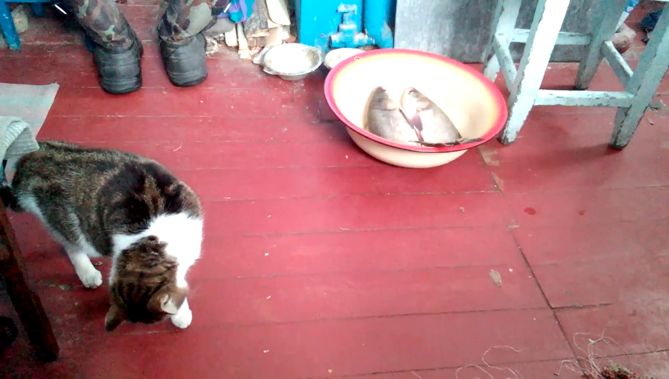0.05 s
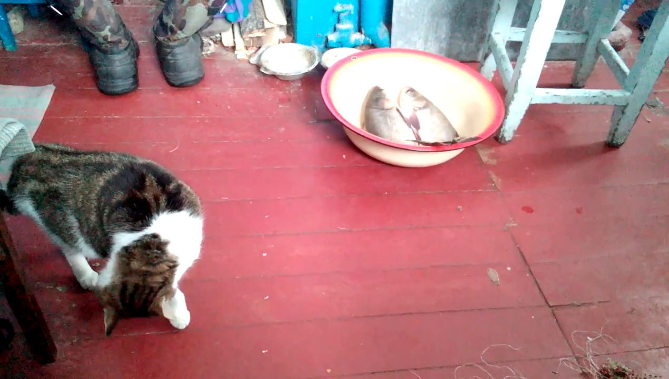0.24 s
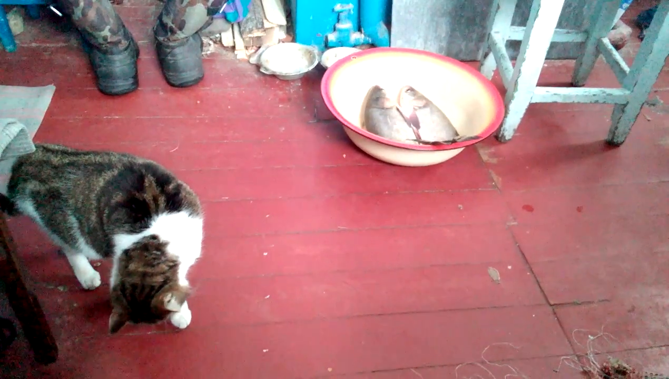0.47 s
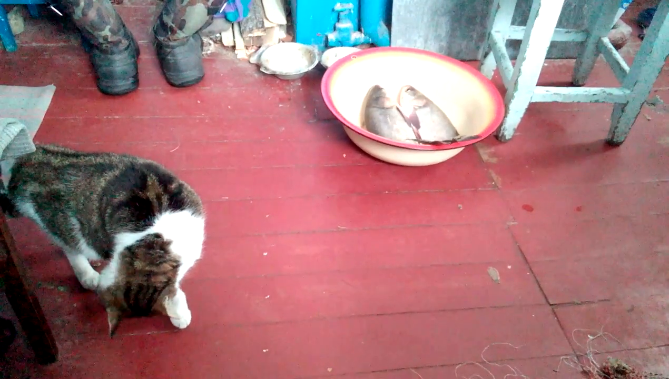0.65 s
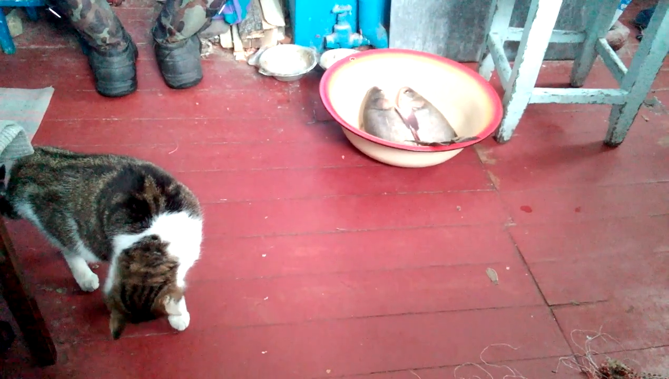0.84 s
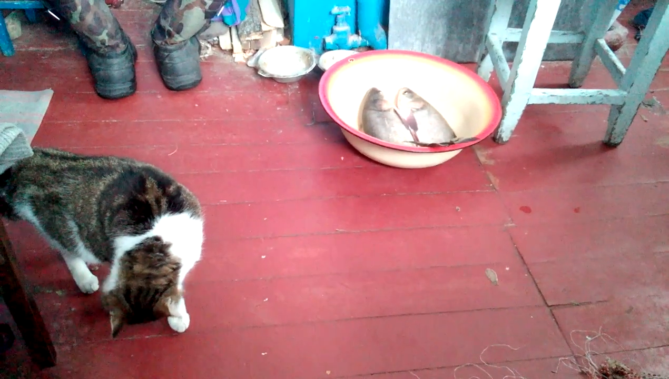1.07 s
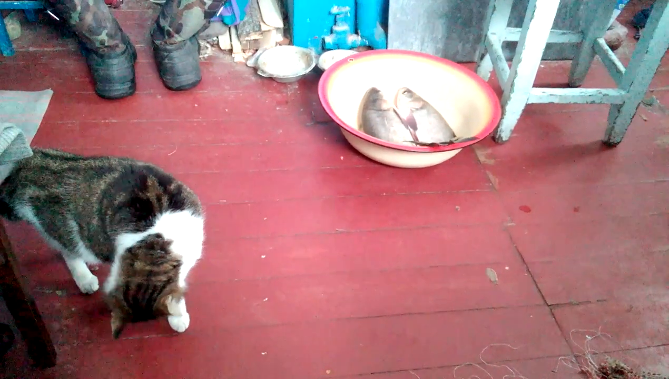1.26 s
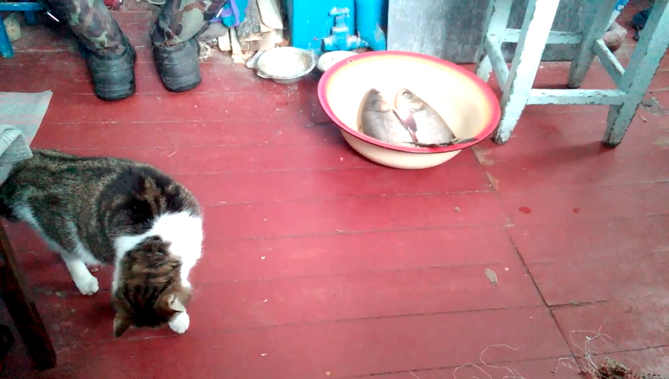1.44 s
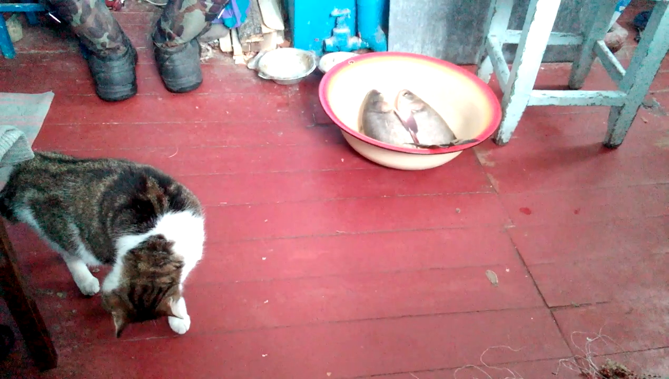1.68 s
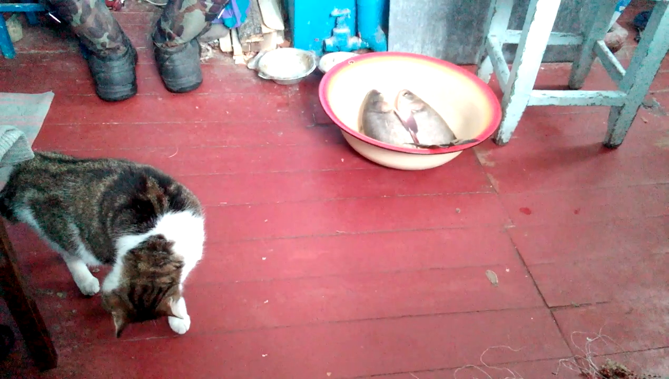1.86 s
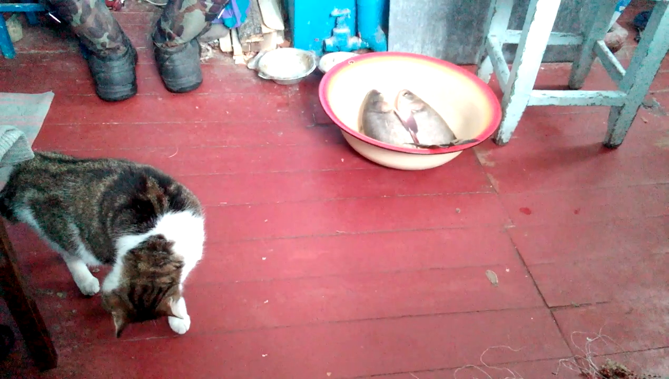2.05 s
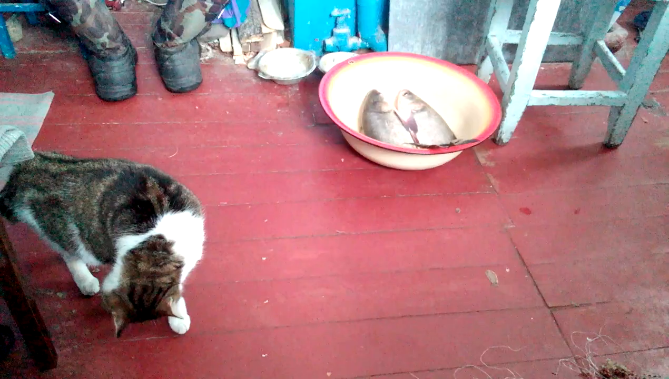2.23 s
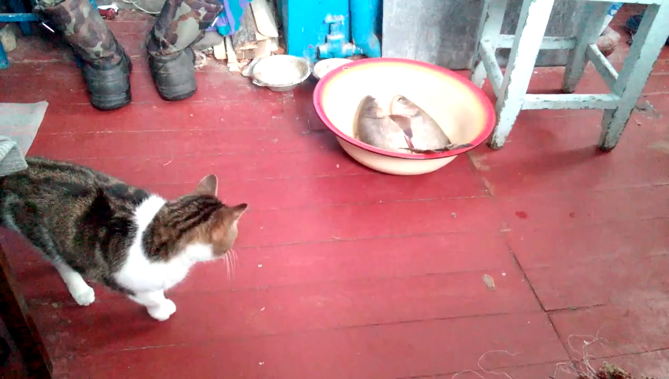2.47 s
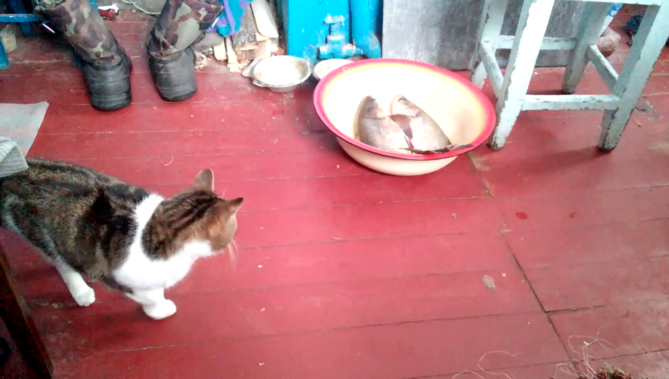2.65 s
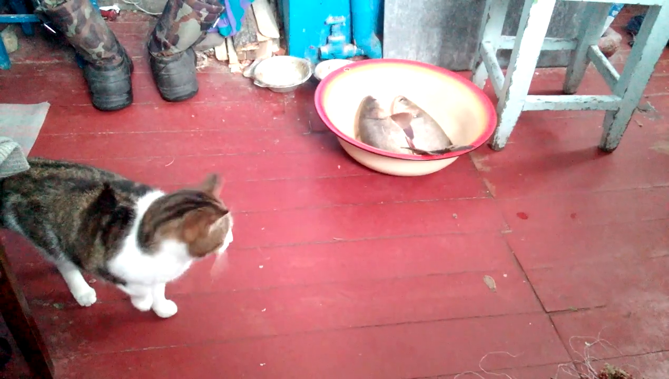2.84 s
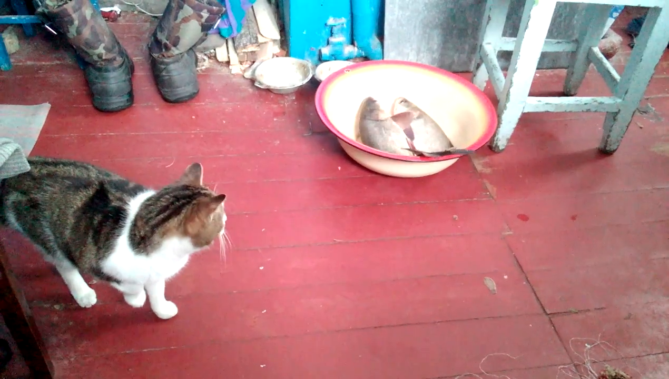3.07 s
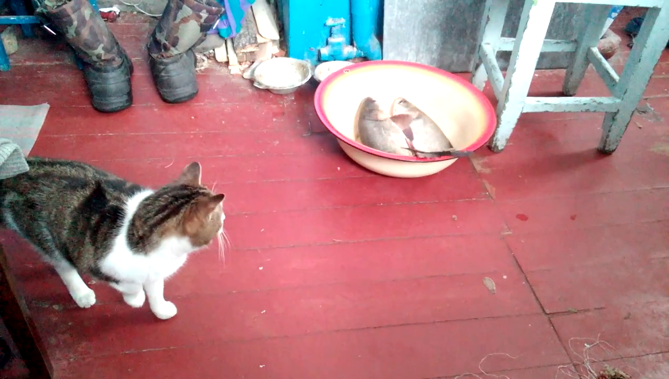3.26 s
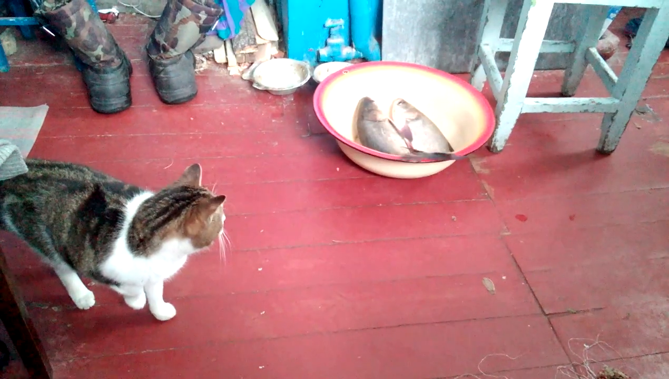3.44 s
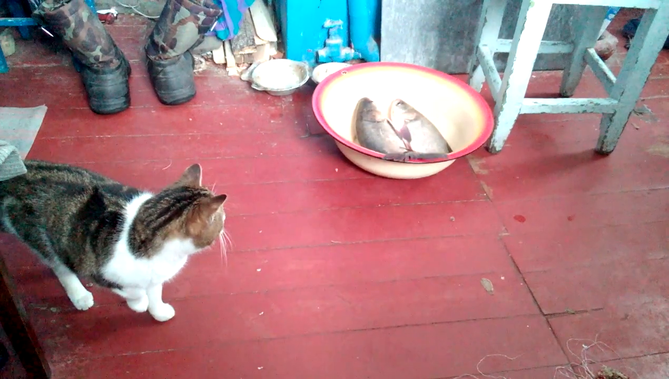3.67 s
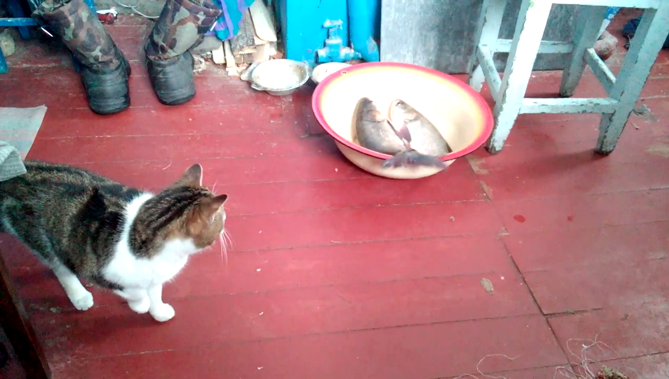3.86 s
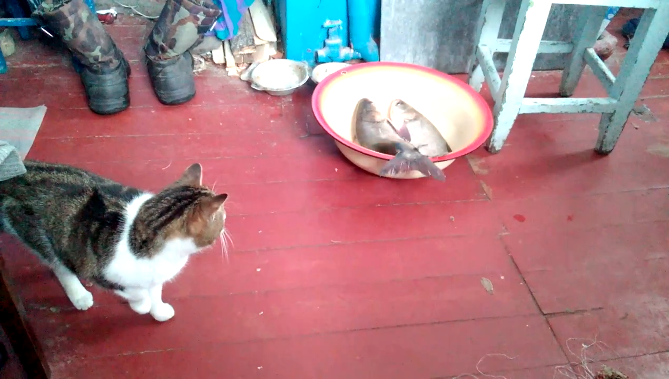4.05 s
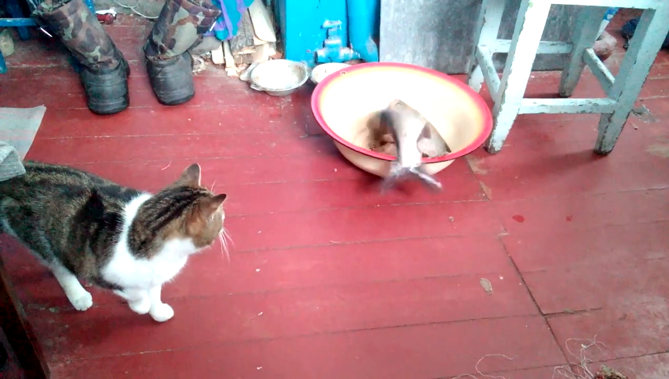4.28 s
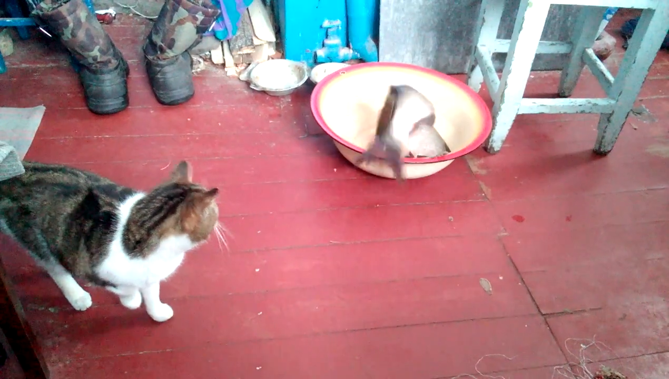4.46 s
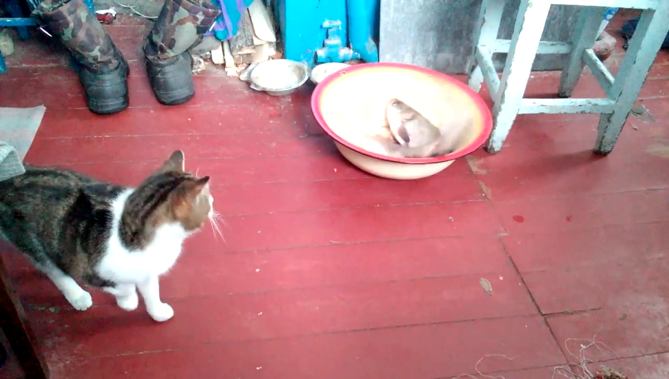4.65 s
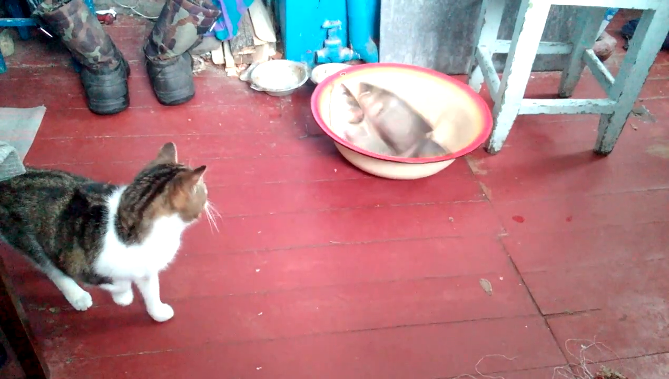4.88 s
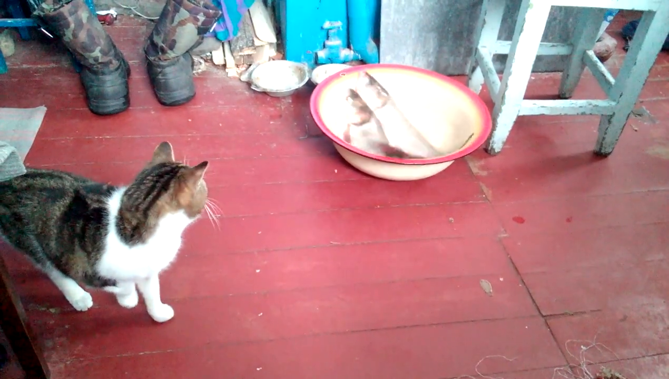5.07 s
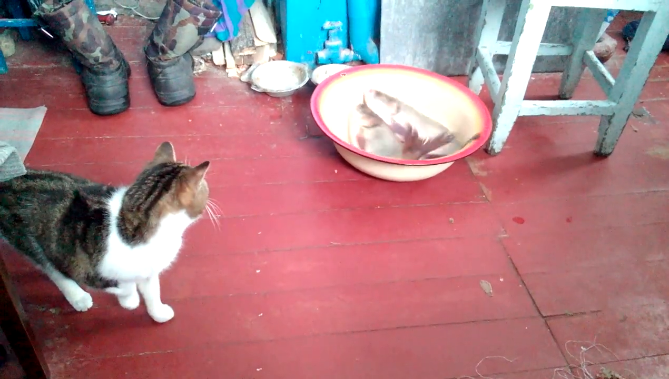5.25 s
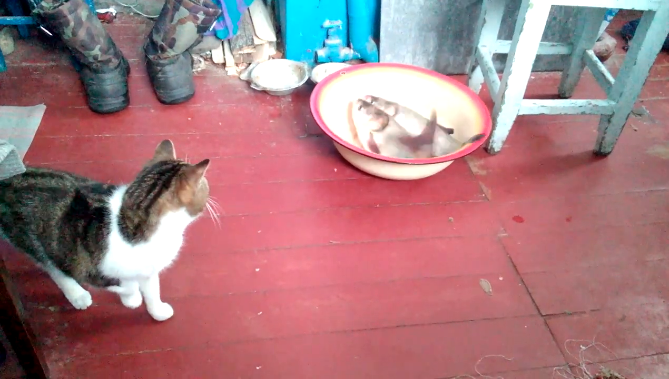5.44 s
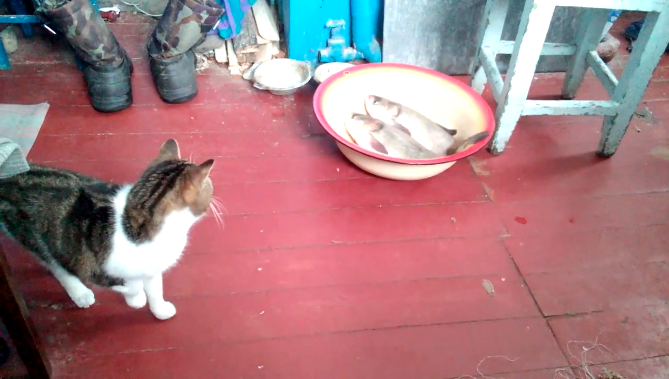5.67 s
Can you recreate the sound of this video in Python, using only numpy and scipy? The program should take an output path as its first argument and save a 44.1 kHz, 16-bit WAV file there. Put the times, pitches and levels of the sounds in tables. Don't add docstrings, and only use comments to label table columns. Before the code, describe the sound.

A fixed small-camera microphone hisses steadily in a small wooden-floored room with a short reverb. Furniture knocks quickly at half a second and more softly at one second. Two clear dish clinks ring out around three seconds. Then fish stir and thrash in a damped enamel basin, slapping wetly, thumping the boards and rocking the rim in short bursts before nearly stopping.

```python
import sys
import numpy as np
from scipy import signal
from scipy.fft import rfft, irfft, next_fast_len
from scipy.io import wavfile
from scipy.ndimage import uniform_filter1d

SR = 44100
rng = np.random.default_rng(int(sys.argv[2]) if len(sys.argv) > 2 else 0)


def voltage_ratio(level):
    return 10 ** (np.asarray(level, float) / 20)


def unload_wav(signal):
    wavfile.write(
        sys.argv[1],
        SR,
        np.round(np.clip(np.atleast_2d(signal).T, -1, 1) * 32767).astype(np.int16),
    )


N = 251807
SPAN = SR * 2 // 5
T = np.arange(SPAN) / SR
HZ = np.fft.rfftfreq(2 * SPAN, 1 / SR)

# frequency [Hz], density [dB per Hz].
HISS_SPECTRUM = [(15, -64), (25, -16.5), (91, -0.5), (216, -8), (261, -8.5), (299, -8), (371, -11),
                 (981, -13.5), (1180, -13), (5090, -15), (5520, -13.5), (6850, -15), (15800, -15.5)]
# frequency [Hz], time to fall 60 dB [s].
ROOM_DECAY = [(60, 0.3), (300, 0.31), (1500, 0.27), (5000, 0.24), (9000, 0.22), (14000, 0.14)]
# start [s], end [s], period [s], level [dB].
CHIRP_BOUTS = [
    (1.8, 2.3, .116, -83),
    (2.504, 3.1, .116, -84),
    (3.422, 4.15, .113, -78),
]
# start [s], peak [dB], contact [s], edge level [dB], added edge mode
# [Hz].
WOOD_KNOCKS = [
    (0.547, -43, 0.0049, -2, 3540),
    (0.6024, -34.5, 0.0026, -6.5, 5100),
    (0.612, -36, 0.004, -7, 4800),
    (1.045, -53, 0.011, 0, 5270),
    (1.061, -47, 0.0078, -5, 2900),
    (1.083, -52, 0.0061, -19, 4800),
]
# frequency [Hz], width [Hz], level [dB].
WOOD_MODES = [(276, 50, -9), (542, 80, -13), (812, 82, -5.5), (1080, 190, -12), (1320, 93, 0.5),
              (1560, 450, -15.5), (2070, 340, -17)]
# frequency [Hz], width [Hz], level [dB].
WOOD_EDGE_MODES = [(2650, 1400, -16), (4800, 360, -1), (5660, 770, -9), (7420, 270, -4), (9000, 620, -13)]
# start [s], peak [dB], centre [Hz].
TICKS = [
    (1.2422, -57.5, 6300),
    (1.4544, -70, 7150),
    (1.5694, -70, 7960),
    (1.5994, -70, 5500),
    (1.6761, -66, 7260),
    (3.5294, -67, 6900),
]
# start [s], peak [dB], centre [Hz].
TAPS = [
    (0.509, -64, 362),
    (0.9, -63, 296),
    (2.536, -64, 680),
    (2.665, -65.5, 690),
    (3.376, -68.5, 2850),
    (4.3, -62.5, 395),
    (4.515, -59.5, 299),
    (4.639, -49.5, 640),
    (5.629, -56, 670),
]
# start [s], peak [dB].
FIRST_EDGE_BLOWS = [
    (2.8815, -22.5),
    (2.889, -25),
]
# start [s], peak [dB].
SECOND_EDGE_BLOWS = [
    (3.151, -20.5),
]
# start [s], peak [dB].
LIGHT_TOUCHES = [
    (0.898, -53.5),
    (2.411, -53),
]
# frequency [Hz], width [Hz], level [dB].
FIRST_EDGE_MODES = [(264, 42, -10), (937, 69, -7), (1380, 50, -11), (2020, 34, -12), (2380, 120, -14),
                    (3230, 30, -15), (3490, 29, -4), (5310, 36, 0), (5580, 17, -17), (5930, 38, -15),
                    (6150, 29, -19), (6430, 27, -21), (6710, 55, -22), (6990, 36, -20), (7570, 110, -10),
                    (7830, 58, -26), (8130, 39, -11), (8510, 26, -22), (8800, 200, -16), (9650, 36, -13),
                    (10200, 49, -32), (11300, 48, -26), (11500, 40, -20), (11900, 48, -16),
                    (13000, 53, -20), (13100, 130, -27), (13800, 45, -24), (15300, 35, -34)]
# frequency [Hz], width [Hz], level [dB].
SECOND_EDGE_MODES = [(242, 70, -11), (1370, 71, -13), (2560, 42, -11), (3140, 97, -15), (3500, 140, -9),
                     (4140, 18, -11), (4350, 140, -9), (4700, 18, -15), (4940, 25, -17), (5490, 46, 0),
                     (5880, 49, -15), (6190, 42, -8), (6920, 28, -6), (7420, 87, 0), (7690, 15, -14),
                     (8090, 49, -10), (8540, 27, -22), (8710, 19, -20), (8840, 36, -15), (8970, 16, -15),
                     (9590, 120, -19), (10700, 38, -24), (11100, 43, -25), (11600, 42, -20),
                     (11900, 33, -22), (12400, 34, -25), (13000, 58, -21), (14600, 100, -32),
                     (5360, 56, 4.5), (7445, 42, 4), (7000, 27, -11)]
# frequency [Hz], width [Hz], level [dB].
FIRST_EDGE_FURTHER_MODES = [(3492, 9.3, -6.5), (5305, 28, -6.5), (5070, 73, -11)]
# frequency [Hz], level [dB].
CLATTER_SPECTRUM = [(150, -28), (400, -50), (1000, -7.5), (1700, -15), (3000, -12), (6000, -8),
                    (9000, -18.5), (12000, -16), (15500, -25)]
# start [s], peak [dB], strongest board mode [Hz].
THUMPS = [(0.901, -55, 295), (0.929, -48, 245), (1.071, -59, 290), (2.929, -63, 240), (3.155, -50, 284),
          (4.241, -59, 90), (4.296, -57.5, 139), (4.344, -47, 95.5), (4.699, -34, 144), (4.724, -27.5, 175),
          (4.744, -27, 244), (4.935, -36.5, 83), (5.187, -24.5, 209), (5.448, -56, 148),
          (5.669, -44.5, 103)]
# start [s], peak [dB].
FLAT_LANDINGS = [
    (1.019, -64),
    (3.237, -63),
    (4.451, -54),
    (4.513, -31.5),
    (4.552, -39.5),
    (4.669, -40),
    (5.632, -43.5),
]
# start [s], peak [dB], board mode [Hz],
# loss a rock [dB].
FALLS = [
    (4.63, -31.5, 87, 18),
    (4.763, -23.5, 114.3, 22),
    (4.961, -29.5, 169, 4.5),
    (5.209, -23, 113, 10),
]
# frequency [Hz], width [Hz], level [dB].
BOARD_MODES = [(57, 54, -8.5), (113, 11.3, -0.5), (175, 28, -2.5), (253, 71, -2), (330, 25, -8)]
# start [s], peak [dB], added rim mode [Hz], belly level [dB].
BOWL_KNOCKS = [(4.237, -60, 1410, -11), (4.309, -68, 1360, -13), (4.356, -54.5, 1030, -5),
               (4.628, -42.5, 910, -4), (4.72, -26, 960, -15), (4.748, -30.5, 1360, -5.5),
               (4.799, -41, 1040, -11), (4.944, -36.5, 1320, -1.5), (4.981, -34, 1035, -3.5),
               (5.039, -44, 1090, -5), (5.184, -28.5, 925, -2), (5.198, -27, 990, 21),
               (5.385, -61, 1335, 8), (5.631, -55.5, 990, -9)]
# frequency [Hz], width [Hz], level [dB].
BOWL_MODES = [(385, 80, 9.5), (670, 103, 9.5), (826, 210, -0.5), (1070, 48, 5), (1303, 33, 3),
              (1560, 160, -10), (2360, 1100, -15.5)]
# start [s], peak [dB], brightest frequency [Hz],
# treble tilt [dB per octave], slide under the slap [dB].
SLAPS = [(4.2305, -53, 5300, -5, 5), (4.2821, -49, 3850, 3, 6.5), (4.5233, -45.5, 4330, -4, 29),
         (4.605, -38.5, 4970, -3, 20), (4.615, -33, 3930, -5.5, 8.5), (4.7181, -29, 3080, 2.5, 30),
         (4.7289, -25.5, 2860, 4, 17), (4.847, -46.5, 4150, 5, 3.5), (4.948, -37, 3200, -4, 3),
         (4.9567, -36, 4800, 2.5, 7), (5.0269, -44, 5130, -9.5, 3), (5.107, -38, 4300, 0, 7.5),
         (5.1972, -35.5, 3500, -10.5, 13), (5.235, -52.5, 6800, 5, 0.5), (5.3767, -49.5, 2900, -12, 26),
         (5.663, -51, 7300, 11.5, 11)]
# frequency [Hz], density [dB per Hz].
WET_SPECTRUM = [(1060, -15.5), (1800, -17), (2400, -16.5), (2900, -3.5), (3320, -10), (4370, -3),
                (4740, -7.5), (8830, -10.5), (10800, -26), (16000, -26.5)]


def along(points, hz):
    f, v = np.transpose(points)
    return np.interp(np.log(hz + 1), np.log(f + 1), v)


def body(modes):
    total = 0
    for k, (centre, width, db) in enumerate(modes):
        damping = 1j * HZ * width
        total = total + (-1) ** k * voltage_ratio(db) * damping / (centre * centre - HZ * HZ + damping)
    return total


def contact(length):
    u = T / max(length, 0.0001)
    return rng.standard_normal(SPAN) * u * np.exp(-2 * u)


def room(x, wet_db):
    hz, t, z = signal.stft(rng.standard_normal(SPAN), SR, nperseg=256)
    t60 = np.maximum(along(ROOM_DECAY, hz), 0.03)[:, None]
    tail = signal.istft(z * voltage_ratio(-60 * t / t60), SR, nperseg=256)[1][:SPAN]
    tail = tail * (1 - np.exp(-T / 0.002))
    return x + voltage_ratio(wet_db) * signal.fftconvolve(x, tail / np.linalg.norm(tail))[:SPAN]


def add(out, s, db, force, response, wet_db):
    struck = irfft(rfft(force, 2 * SPAN) * response)[:SPAN]
    x = room(struck, wet_db)
    peak = np.sqrt(np.max(uniform_filter1d(x ** 2, size=256)))
    out[round(s * SR):][:SPAN] += voltage_ratio(db) * x / peak


def hiss():
    m = next_fast_len(N)
    colour = voltage_ratio(along(HISS_SPECTRUM, np.fft.rfftfreq(m, 1 / SR)))
    x = irfft(rfft(rng.standard_normal(m)) * colour, m)[:N]
    return voltage_ratio(-63.5) * x / np.std(x)


def insect(out):
    chirp_s, wing_hz, scatter_db = 0.049, 5540, -2
    wing = body([(wing_hz, 250, 0)]) ** 2
    for start, end, period, db in CHIRP_BOUTS:
        for s in np.arange(start, end, period):
            swell = np.sin(np.pi * np.clip(T / chirp_s, 0, 1))
            stroke = rng.standard_normal(SPAN) * swell
            add(out, s, db + scatter_db * rng.standard_normal() + 5, stroke, wing, wet_db=-8.5)


def furniture(out):
    for s, db, length, edge_db, hz in WOOD_KNOCKS:
        add(out, s, db - 5.5, contact(length), body(WOOD_MODES), wet_db=-0.5)
        edge = body(WOOD_EDGE_MODES) + 0.7 * body([(hz, 250, 0)])
        add(out, s, db + edge_db - 8, contact(3 * length), edge, wet_db=-1)


def ticks_and_taps(out):
    for rows, width_hz, contact_s in ((TICKS, 2900, 0.012), (TAPS, 500, 0.012)):
        for s, db, hz in rows:
            add(out, s, db, contact(contact_s), body([(hz, width_hz, 0)]) ** 2, wet_db=-3.0)


def dish(out):
    blow = np.exp(-T * SR)
    clatter = voltage_ratio(along(CLATTER_SPECTRUM, HZ))
    # blows, modes, treble lift in dB per octave (light touches have most), clatter in dB
    touches = ((FIRST_EDGE_BLOWS, FIRST_EDGE_MODES + FIRST_EDGE_FURTHER_MODES, 3.5, -18),
               (SECOND_EDGE_BLOWS, SECOND_EDGE_MODES, -0.5, -14),
               (LIGHT_TOUCHES, FIRST_EDGE_MODES, 4.5, -19))
    for rows, modes, hard_db, clatter_db in touches:
        ring = body(modes) * (1 + 1j * HZ / 4000) ** (hard_db / 6)
        for s, db in rows:
            add(out, s, db - 9.5, blow, ring, wet_db=3.5)
            add(out, s, db + clatter_db, np.roll(contact(0.0044), 60), clatter, wet_db=0.0)


def rocking():
    first_s, ratio, rim_board_hz = 0.046, 0.96, 104.6
    rocks = []
    for s, db, hz, loss in FALLS:
        for k in range(4):
            share = 0.5 ** k
            pitch = hz ** share * rim_board_hz ** (1 - share)
            rocks.append((s + first_s * k * ratio ** (k - 1), db - k * loss, pitch))
    return rocks


def thumps(out):
    boards = voltage_ratio(-8.5) * body(BOARD_MODES)
    highpass = signal.butter(6, 50, "high", analog=True)
    radiated = signal.freqs(*highpass, HZ)[1]
    t60 = 0.12
    blows = [tuple(row) for row in THUMPS] + rocking()
    blows += [(s, db, 63) for s, db in FLAT_LANDINGS]
    for s, db, hz in blows:
        push = np.sin(np.pi * np.clip(T * hz / 0.52, 0, 1)) ** 2
        near = body([(hz, 3.5 / t60, 0)])
        add(out, s, db - 4, push, (near + boards) * radiated, wet_db=-1.5)


def bowl(out):
    belly, rim = body(BOWL_MODES[:3]), body(BOWL_MODES[3:])
    for s, db, hz, belly_db in BOWL_KNOCKS:
        shell = voltage_ratio(belly_db) * belly - rim + body([(hz, 110, 0)])
        add(out, s, db - 11.5, contact(0.014), shell, wet_db=0.0)


def slaps(out):
    grain, spatter_db = SR // 600, 7
    slap_s, slide_s, slide_after_s = 0.0088, 0.027, 0.02
    skin = voltage_ratio(along(WET_SPECTRUM, HZ))
    for s, db, hz, tilt_db, slide_db in SLAPS:
        tilt = voltage_ratio(tilt_db * np.log2(HZ / 4000 + 0.26))
        bright_spot = 1 + 1.2 * np.abs(body([(hz, 700, 0)]))
        colour = skin * tilt * bright_spot
        for late, less_db, length in ((0, 0, slap_s), (slide_after_s, slide_db, slide_s)):
            grains = voltage_ratio(spatter_db * rng.standard_normal(SPAN // grain + 1))
            spatter = grains.repeat(grain)[:SPAN]
            force = np.roll(spatter * contact(length), 40)
            add(out, s + late, db - less_db - 10, force, colour, wet_db=1.5)


def scene():
    out = np.zeros(N + SPAN)
    for source in (insect, furniture, ticks_and_taps, dish, thumps, bowl, slaps):
        source(out)
    return (out[:N] + hiss())[None]


def low_pass(x):
    return signal.sosfilt(signal.butter(12, 16470, fs=SR, output="sos"), x)


def record(dry):
    kept = np.fft.rfftfreq(N, 1 / SR) < 15800
    mix = irfft(rfft(dry) * kept, N)
    return low_pass(mix)


dry = scene()
out = record(dry)
unload_wav(out)
```